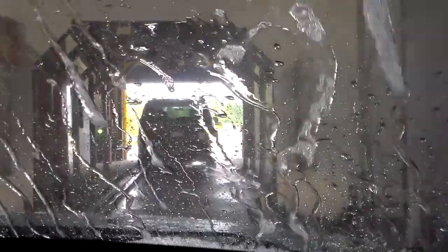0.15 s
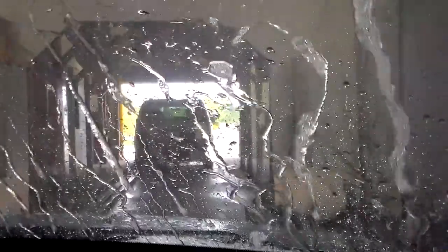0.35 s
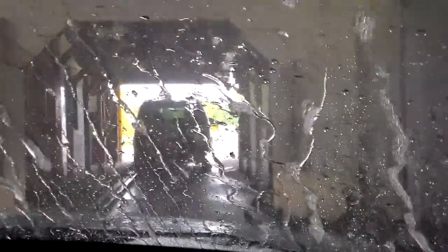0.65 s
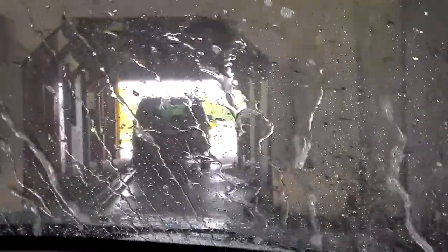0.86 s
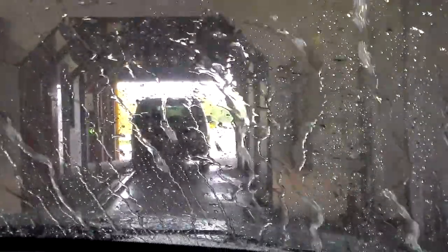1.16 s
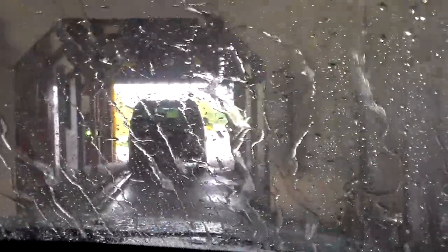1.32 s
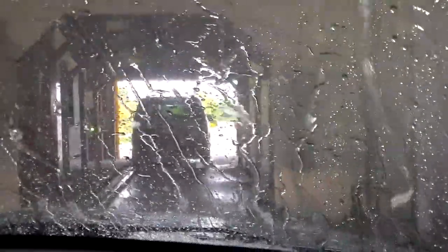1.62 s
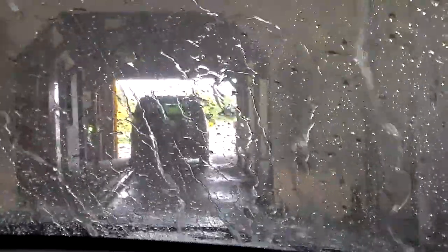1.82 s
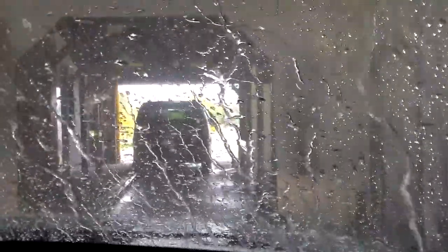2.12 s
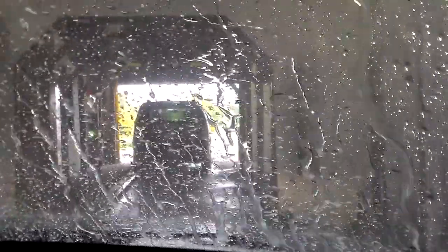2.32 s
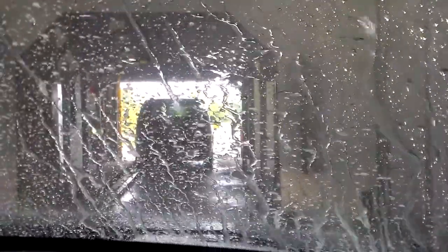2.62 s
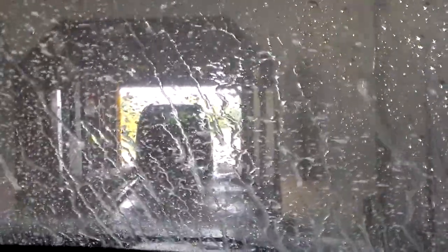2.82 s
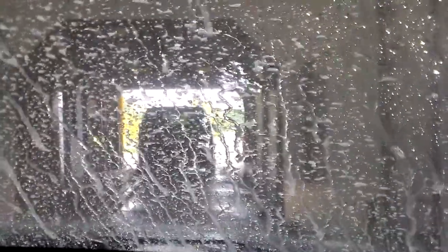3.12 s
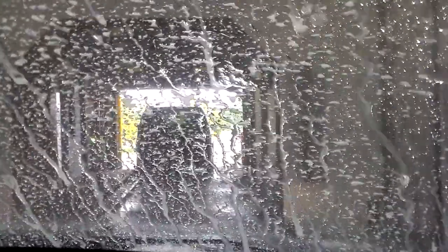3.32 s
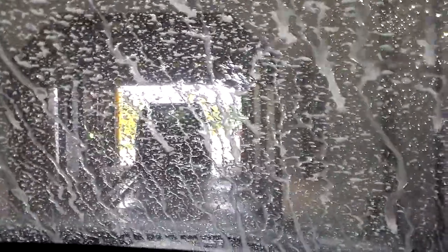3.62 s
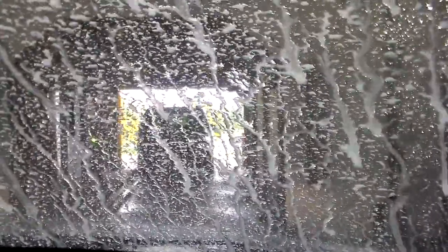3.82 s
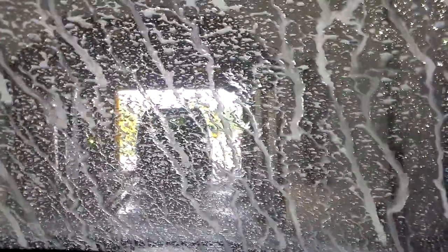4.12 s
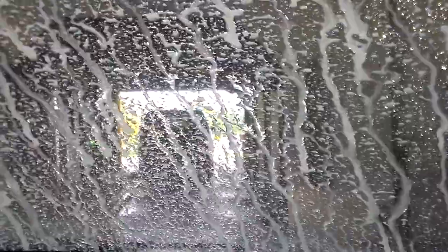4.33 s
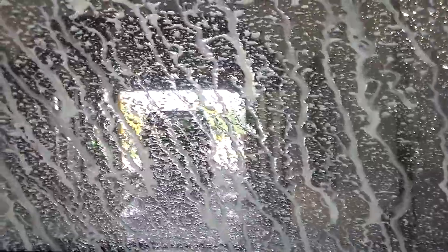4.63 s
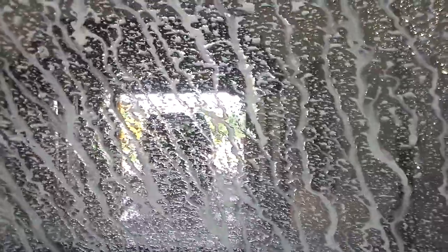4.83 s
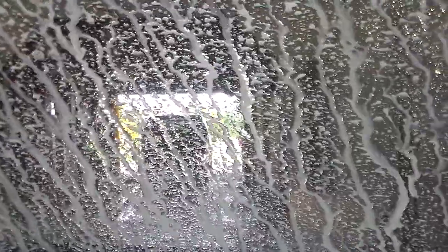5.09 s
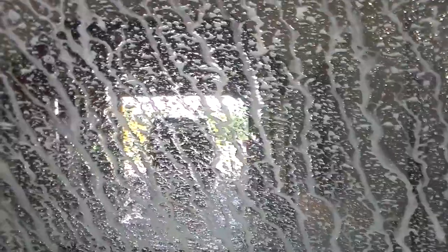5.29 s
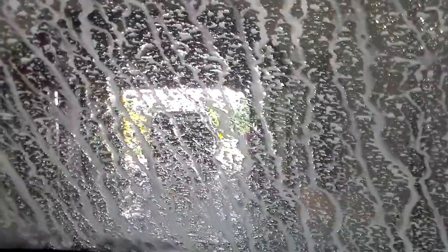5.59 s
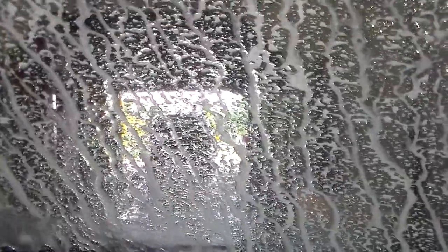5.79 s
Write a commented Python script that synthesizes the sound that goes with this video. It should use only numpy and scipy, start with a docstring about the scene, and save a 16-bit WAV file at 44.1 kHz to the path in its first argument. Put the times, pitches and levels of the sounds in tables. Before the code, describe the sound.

Inside a closed car, a steady, throbbing blower roar hums, with gusty air rush and a soft hissing patter of droplets on glass.

```python
"""The air dryers of a tunnel car wash, heard from inside a closed car.
From the start the blowers' roar drones through the body: shaped noise with ringing booms, wavering fan tones
and a deep throb. Air jets buffet the windscreen with coloured noise and drive a patter of fine spray over it.
Soon gusts and lulls follow, brief tones rise from the drone, it dips, and a few bigger drops splash as noise.
The spray thins, then picks up near the end. The recorder's limiter holds the peaks down throughout."""
import sys
import numpy as np
from scipy import signal
from scipy.fft import rfft, irfft
from scipy.io import wavfile
from scipy.ndimage import uniform_filter1d, minimum_filter1d

SR = 44100
rng = np.random.default_rng(int(sys.argv[2]) if len(sys.argv) > 2 else 0)


def unload_audio(sound):
    """Save the sound as a 16-bit wav file, at the path given as the first command line argument."""
    columns = np.transpose(np.atleast_2d(sound))
    # keep every value between -1 and 1, then stretch to whole-number steps
    steps = np.round(np.clip(columns, -1, 1) * 32767)
    wavfile.write(sys.argv[1], SR, steps.astype(np.int16))


N = 262395
TIME = np.arange(N) / SR   # s
FREQS = np.maximum(np.fft.rfftfreq(N, 1 / SR), 1)   # Hz


def from_db(db):
    """Decibels to gain."""
    return 10 ** (np.asarray(db) / 20)


def rms_one(x):
    """Scale to an rms of 1."""
    return x / np.sqrt(np.mean(x ** 2) + 1e-20)


def in_time(rows):
    """A (time, level) table joined by straight lines, at every sample."""
    time_s, level_db = np.transpose(rows)
    return np.interp(TIME, time_s, level_db)


def over_hz(points):
    """A table joined by straight lines in log frequency."""
    hz, value = np.transpose(points)
    return np.interp(np.log(FREQS), np.log(hz), value)


def bell(crest_s, length_s):
    """Gaussian of height 1; length_s is its full width at 1/e."""
    return np.exp(-np.minimum((2 * (TIME - crest_s) / length_s) ** 2, 20))


def drift(rate_hz):
    """Slow noise of rms 1, low-passed at about rate_hz."""
    spectrum = rfft(rng.standard_normal(N))
    return rms_one(irfft(spectrum / (1 + (FREQS / rate_hz) ** 2), N))


def resonance(hz, width_hz):
    """Noise of rms 1 around one frequency; half amplitude at width_hz to either side."""
    spectrum = rfft(rng.standard_normal(N))
    return rms_one(irfft(spectrum / (1 + ((FREQS - hz) / width_hz) ** 2), N))


def white_pair():
    """Two unrelated white noises."""
    return rng.standard_normal((2, N))


# likeness of the two channels: (frequency [Hz], correlation [-1 to 1])
CHANNEL_CORRELATION = [(30, .997), (350, .996), (700, .985), (1400, .955), (2000, .91), (3700, .78),
                       (4600, .42), (5400, .3), (5900, -.08), (8000, -.38), (10000, -.27), (13000, -.47)]


def in_cabin(pair, gain):
    """Colour two unrelated signals and blend to stereo, alike in the bass, apart in the treble; rms 1."""
    mid, side = rfft(pair)
    alike = np.clip(over_hz(CHANNEL_CORRELATION), -.999, .999)
    stereo = np.sqrt(1 + alike) * mid + np.sqrt(1 - alike) * side * [[1], [-1]]
    return rms_one(irfft(gain * stereo, N))


# blower roar as the car body lets it through: (frequency [Hz], relative density [dB per Hz])
ROAR_SPECTRUM = [(8, -15), (25, -5.5), (50, -3.5), (72, -3.5), (130, -0.5), (190, 0), (212, -2),
                 (310, -4.5), (350, 0.8), (460, 0), (505, -6.5), (650, -10), (700, -17), (1100, -38),
                 (8000, -71)]
# booms of cabin and ducts: (frequency [Hz], half-width [Hz], rms at start [dB], rms at end [dB])
BOOMS = [(114.3, 6.4, -33.5, -42.5), (147, 23, -38, -34), (189.4, 15, -40.5, -45),
         (254.4, 12.4, -34, -41.5), (361, 27, -37.5, -32.5), (404, 4.9, -48.5, -35),
         (445.4, 25.6, -35, -32.5), (628, 34, -43, -43.5)]
ROAR_RMS_DB = -24


def drone():
    """Broad blower roar, and the narrow booms it keeps ringing; their levels shift as the car rolls on."""
    out = from_db(ROAR_RMS_DB) * in_cabin(white_pair(), from_db(over_hz(ROAR_SPECTRUM)))
    for hz, width_hz, first_db, last_db in BOOMS:
        out += from_db(np.linspace(first_db, last_db, N)) * resonance(hz, width_hz)
    return out


# fan tones: (frequency [Hz], rms level [dB], rms pitch wander [Hz])
FAN_TONES = [(438.7, -38.5, 9), (532, -41, 1.06), (722, -52.5, 2.03), (833, -60.5, 2.05)]


def hum(waver_db):
    """Fan tones; the turbulent air makes each waver in pitch and strength."""
    out = np.zeros(N)
    for hz, db, wander_hz in FAN_TONES:
        turns = np.cumsum(hz + wander_hz * drift(5.7)) / SR + rng.random()
        tone = np.sin(2 * np.pi * turns) * from_db(waver_db * drift(10))
        out += from_db(db) * rms_one(tone)
    return out


# deep throb of the cabin air, before the trim: (time [s], level [dB])
THROB_LEVEL = [(0.0, -43), (0.26, -27), (0.33, -47), (0.51, -25), (0.6, -38), (0.88, -26.5), (1.04, -38),
               (1.09, -30), (1.28, -34), (1.41, -56), (1.44, -36), (1.59, -42), (1.62, -31), (2.2, -36),
               (2.72, -33), (2.9, -49), (3.02, -38), (3.13, -41), (3.4, -25), (3.43, -44), (3.56, -24),
               (3.61, -35), (4.19, -33), (4.29, -46), (4.34, -28), (4.69, -35), (4.84, -35), (4.89, -35),
               (4.99, -28), (5.22, -37), (5.29, -32), (5.55, -41), (5.73, -28), (5.8, -44), (5.92, -38),
               (5.95, -43)]
THROB_HZ, THROB_TRIM_DB = 41.2, -1.6


def throb(wander_hz):
    """The lowest resonance of the cabin, a sine pumped unevenly by the jets."""
    turns = np.cumsum(THROB_HZ + wander_hz * drift(3.1)) / SR
    return from_db(in_time(THROB_LEVEL) + THROB_TRIM_DB) * rms_one(np.sin(2 * np.pi * turns))


# air jets on the windscreen: (frequency [Hz], relative density [dB per Hz])
JET_SPECTRUM = [(60, -12.5), (720, 1), (980, -2), (1400, -4.5), (1900, -9.5), (2800, -11.5), (3700, -15),
                (4500, -21), (5500, -23.5), (7000, -31), (14000, -40.5)]
# peaks and notches put on the rush by glass and cabin: (frequency [Hz], half-width at 1/e [Hz], gain [dB])
GLASS_RIPPLE = [(954, 21, -3.5), (1157, 22, 3.5), (1400, 47, 3), (1850, 38, 2), (1910, 47, -1.5),
                (2200, 40, 1.5), (2370, 78, -3), (2490, 70, 1), (2920, 90, 0.5), (3160, 50, -1),
                (3570, 87, 2.5)]
# steady push of the jets, before the trim: (time [s], level [dB])
AIR_FLOW = [(0, -33), (2.4, -34.5), (4.5, -33.5), (5.95, -33.5)]
JET_TRIM_DB = -0.02


def jet(gust_db, flutter_db):
    """Air rush on the windscreen: gusting, fluttering noise, coloured by glass and cabin."""
    ripple_db = sum(db * np.exp(-((FREQS - hz) / width_hz) ** 2) for hz, width_hz, db in GLASS_RIPPLE)
    rush = in_cabin(white_pair(), from_db(over_hz(JET_SPECTRUM) + ripple_db))
    level_db = in_time(AIR_FLOW) + gust_db + JET_TRIM_DB + flutter_db * drift(52)
    return from_db(level_db) * rush


# spray on the glass, each side: (frequency [Hz], relative density [dB per Hz])
SPRAY_LEFT = [(500, -23), (4000, 5), (5700, 2.5), (7200, 4), (8500, -3.5), (10500, -2.5), (12000, -2.5),
              (14200, -8)]
SPRAY_RIGHT = [(500, -17), (4000, 0), (6000, 1), (7700, 2.5), (8150, -1), (8600, 0.5), (9150, -2),
               (9500, 1), (10100, -3), (10750, -0.5), (11200, -4), (14200, -11)]
# spray carried by the air, before the trim: (time [s], level [dB])
SPRAY_FLOW = [(0, -48), (.15, -55), (1.9, -55), (3.1, -56.5), (3.7, -57.5), (5.1, -61), (5.6, -56)]
# balance of the spray, leaning right: (time [s], left minus right level [dB])
SPRAY_PAN = [(0, -1.5), (1.4, -4), (3.0, -3), (4.6, -2), (5.95, -1)]
SPRAY_TRIM_DB = 3


def spray(gust_db, per_s, size_db, mist, flutter_db):
    """Thousands of droplets of uneven size tick on the glass over a smooth mist of noise."""
    sizes = from_db(size_db * np.minimum(rng.exponential(1, (2, N)), 4))
    signs = rng.choice([-1, 1], (2, N))
    hits = rng.random((2, N)) < per_s / SR   # per_s holds for each side
    ticks = rms_one(sizes * signs * hits)
    colour = from_db([over_hz(SPRAY_LEFT), over_hz(SPRAY_RIGHT)])
    patter = in_cabin(ticks + mist * white_pair(), colour)
    level_db = in_time(SPRAY_FLOW) + gust_db + SPRAY_TRIM_DB + flutter_db * drift(36)
    return from_db(level_db + in_time(SPRAY_PAN) * [[.5], [-.5]]) * patter


def buffeting():
    """Eddies hit the glass several times a second, at no fixed pace; rms 1."""
    return resonance(hz=4.8, width_hz=7)


# strongest gusts and lulls: (crest time [s], length [s], change of air [dB], change of spray [dB])
GUSTS = [(.176, 0.044, 1, -2), (0.248, .06, 1.5, 2), (0.29, 0.037, -2, -5), (0.38, 0.097, 3, -1),
         (0.45, 0.031, -3, 1), (0.617, 0.035, -1.5, -4), (0.683, .04, -2, -3), (0.813, 0.021, 3, 2.5),
         (0.916, 0.044, -4, -3), (0.988, 0.04, 3, -2), (1.07, 0.043, 2.5, 2), (1.158, .04, -1, -2),
         (1.26, .04, -2.5, -1), (1.314, 0.03, 1.2, 3.5), (1.347, .025, -4, -3), (1.41, 0.037, -5, 0),
         (1.447, .02, 0, 3), (1.51, 0.06, 1.5, 2.2), (1.838, 0.027, 1, 4), (1.868, .04, 0, -5),
         (1.946, 0.045, 5, 4), (1.985, 0.03, -2.5, -2.5), (2.06, .045, 1, 3.5), (2.247, .05, -2.5, -2.7),
         (2.334, .035, 2.5, 3), (2.49, 0.031, 1.5, 4), (2.567, .05, -0.5, 4), (2.688, 0.057, 4, 6),
         (2.736, .05, -3, -1), (2.815, 0.041, 1.5, 4.5), (2.97, 0.05, -3, 2), (3.102, .055, 2, 4),
         (3.25, 0.068, 2, 3.7), (3.472, 0.044, 2.5, -2), (3.617, 0.07, -3.5, -3), (3.81, 0.05, 2.5, 2),
         (3.847, 0.021, -3, 0), (3.905, 0.032, -1.5, -4), (4.07, 0.045, 3.5, 3), (4.15, 0.036, -0.5, -2),
         (4.205, .022, 1, 3), (4.54, 0.043, 1, 9), (4.64, .05, -1.5, -2), (4.724, 0.065, 2.5, -3),
         (4.847, .06, 2, 2), (4.904, 0.039, -3.5, -2), (5.108, 0.076, -1.8, -2.5), (5.425, .05, -2.5, 0),
         (5.523, 0.049, 1, -4), (5.808, 0.036, 2.2, 1)]


def gusts():
    """Each gust or lull comes and goes in a bell shape; dB change of the air and of the spray."""
    return sum(np.outer([air_db, spray_db], bell(crest_s, length_s))
               for crest_s, length_s, air_db, spray_db in GUSTS)


# brief tones in the drone: (crest time [s], frequency [Hz], peak level [dB])
SWELLS = [(.19, 458, -25.5), (.44, 446, -22), (.57, 116, -26.5), (.75, 435, -22.5), (.85, 117, -24.5),
          (.86, 351, -29), (1.02, 357.4, -28), (1.12, 116, -26.5), (1.13, 448, -23), (1.42, 379, -28),
          (1.5, 162, -29.5), (1.71, 448, -27), (1.76, 118, -31), (1.96, 455, -27), (2.6, 448, -27.5),
          (2.69, 118, -28.5), (2.69, 228, -29), (2.85, 450.5, -24.5), (3.11, 127.3, -23.5),
          (3.15, 443, -26.5), (3.56, 439, -26), (3.8, 123.4, -24), (3.87, 377.7, -25), (4.13, 160, -25),
          (4.71, 121, -27.5), (4.75, 452.6, -27), (5.02, 114, -25), (5.19, 151.7, -34),
          (5.41, 407.4, -24.5), (5.5, 446, -27.5), (5.53, 121, -23.5)]
SWELL_LENGTH_S, SWELL_WANDER_HZ = 0.1, 3.76   # wander is rms


def swells():
    """Brief tones, each around one pitch, rise out of the drone and fade in a bell shape."""
    wander_turns = np.cumsum(SWELL_WANDER_HZ * drift(7.4)) / SR   # shared by all swells
    out = np.zeros(N)
    for crest_s, hz, peak_db in SWELLS:
        tone = np.sin(2 * np.pi * (hz * TIME + wander_turns + rng.random()))
        out += from_db(peak_db) * bell(crest_s, SWELL_LENGTH_S) * tone
    return out


# moments when drone and hum sink: (time of the lowest point [s], length [s], change [dB])
DIPS = [(0.294, 0.053, -4), (0.944, .06, -3), (1.173, 0.052, -3), (1.774, 0.032, -2), (2.64, 0.051, -5.5),
        (2.748, 0.06, -3.5), (2.98, 0.056, -1), (3.09, 0.033, -3.5), (3.635, 0.07, -2.5),
        (4.476, 0.033, -5.5), (4.946, 0.028, -6), (5.55, 0.05, -4), (5.876, 0.042, -2)]


def dips():
    """The level dips briefly in bell shapes; change in dB."""
    return sum(db * bell(lowest_s, length_s) for lowest_s, length_s, db in DIPS)


# bigger drops: (time [s], level before trim and pan [dB], t60 [s], band centre [Hz], half-band [octaves])
DROPS = [(.321, -32, 0.04, 5200, 0.11), (1.784, -46, .06, 10000, .3), (3.6440, -31.5, 0.027, 8600, .55),
         (4.3172, -29.5, 0.015, 6800, .4), (4.334, -37, .016, 6500, .4), (4.5243, -45, .05, 8000, .4),
         (5.0355, -39, 0.02, 8000, .3), (5.1953, -32, .018, 7900, 0.25)]
DROP_TRIM_DB = -3.5


def drops(pan_db, rise_s):
    """Each big drop spreads and bursts: a short, decaying splash of band-passed noise."""
    out, hiss = np.zeros((2, N)), in_cabin(white_pair(), 1)
    for start_s, db, t60_s, hz, octaves in DROPS:
        age_s = np.maximum(TIME - start_s, 0)
        edges_hz = np.minimum(hz * 2 ** (octaves * np.array([-1, 1])), SR / 2 - 1)
        band = signal.butter(1, edges_hz, "band", fs=SR, output="sos")
        burst = rms_one(signal.sosfilt(band, hiss))
        rise = 1 - np.exp(-age_s / rise_s)
        out += rise * from_db(db - 60 * np.minimum(age_s / t60_s, 2)) * burst
    return out * from_db(DROP_TRIM_DB + pan_db * np.array([[.5], [-.5]]))


def windscreen(buffet_db):
    """Air, spray and single drops on the glass; gusts and random buffeting move air and spray."""
    air_db, spray_db = gusts() + buffet_db * buffeting()
    air = jet(air_db, flutter_db=0.82)
    fine_spray = spray(spray_db, per_s=2500, size_db=1.5, mist=1.0, flutter_db=0.94)
    return air + fine_spray + drops(pan_db=-2.0, rise_s=0.002)


def scene():
    """Drone and hum dip under swells and throb; the windscreen joins, all leaning slightly right."""
    blowers = (drone() + hum(waver_db=4.5)) * from_db(dips())
    blowers = blowers + throb(wander_hz=1.5) + swells()
    return (blowers + windscreen(buffet_db=0.52)) * from_db([[-.2], [.2]])


def limiter(x, ceiling_db, release_db_per_s, size):
    """The gain ducks just ahead of each peak over the ceiling and soon recovers; size in samples."""
    over_db = np.maximum(20 * np.log10(np.abs(x).max(axis=0) + 1e-9) - ceiling_db, 0)
    release_db = release_db_per_s * TIME
    held_db = np.maximum.accumulate(over_db + release_db) - release_db
    return x * from_db(uniform_filter1d(minimum_filter1d(-held_db, size), size))


def record(dry):
    """Peaks are limited, the sound opens and closes without a click, the top is cut."""
    limited = limiter(dry, ceiling_db=-12.0, release_db_per_s=110, size=45)
    soft_ends = signal.windows.tukey(N, .001)
    low_pass = signal.ellip(12, .1, 80, 14220, fs=SR, output="sos")   # ripple dB, stopband dB, cutoff Hz
    return signal.sosfilt(low_pass, limited * soft_ends)


dry = scene()
out = record(dry)
unload_audio(out)
```